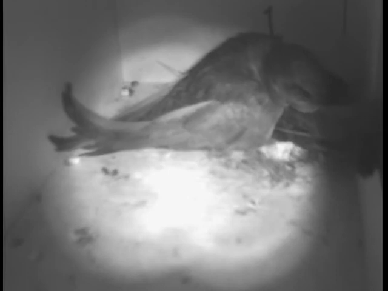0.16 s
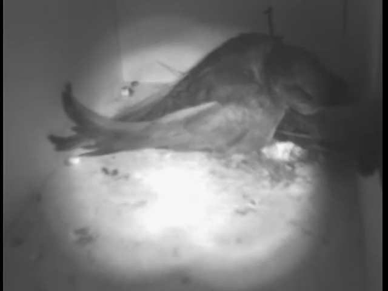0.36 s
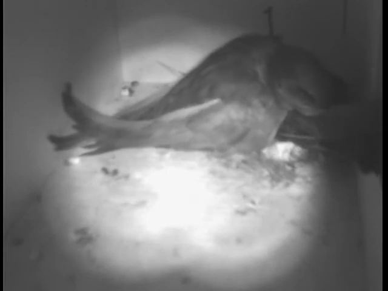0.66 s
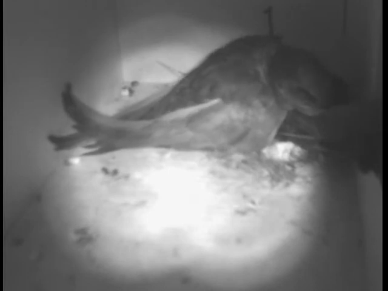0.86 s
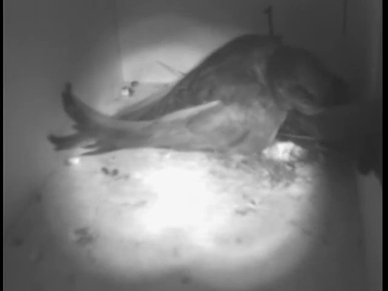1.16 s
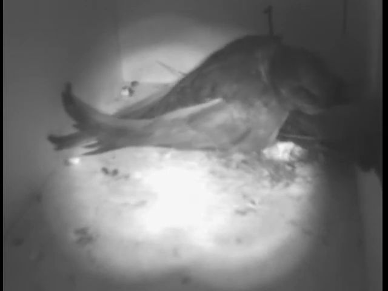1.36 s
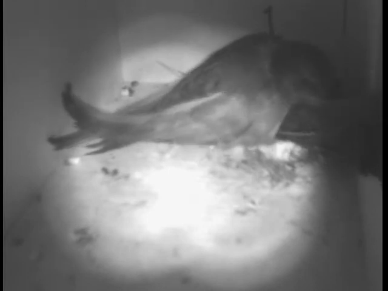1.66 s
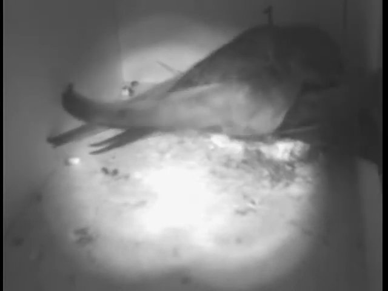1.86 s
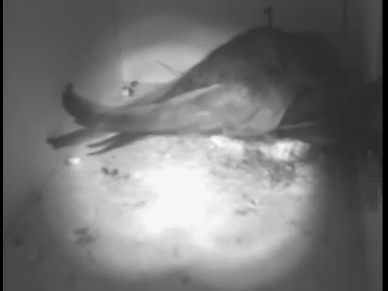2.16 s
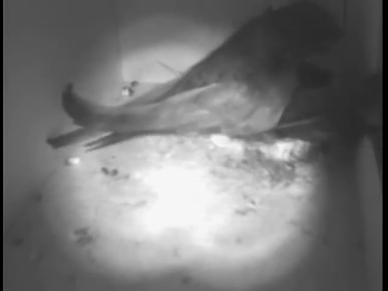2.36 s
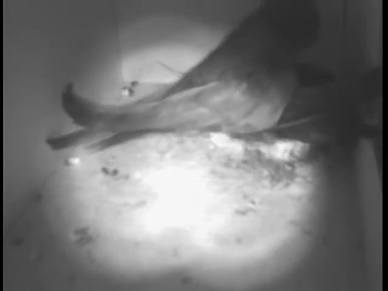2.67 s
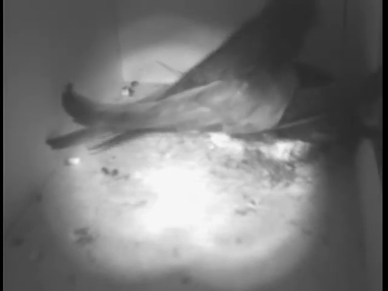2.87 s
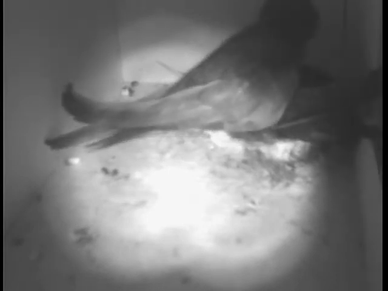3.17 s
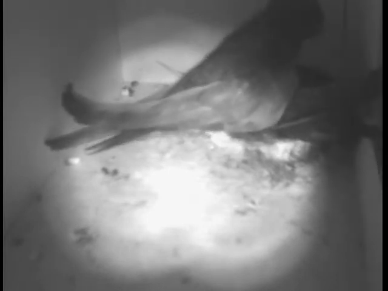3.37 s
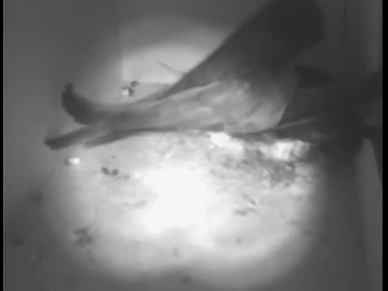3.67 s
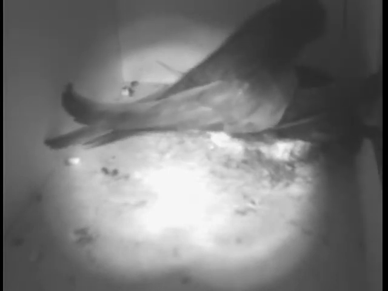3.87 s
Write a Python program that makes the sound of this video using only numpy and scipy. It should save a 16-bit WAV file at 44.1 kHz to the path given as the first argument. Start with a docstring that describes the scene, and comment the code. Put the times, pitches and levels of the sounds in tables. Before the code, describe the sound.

Engine drone rising and swelling outside a wooden nest box, with a bird's scratches and dull knocks.

```python
"""Bird in a nest box, engine outside

A bird shifts and scratches in a small wooden box: grainy strokes, dull knocks and low thumps ring its resonances.
Outside a slow engine speeds up, its orders swelling as they pass the box's air resonance, over a filtered roar.
The microphone, with its hiss and hum, feeds the right channel only.
The camera's electronics buzz, whine and click faintly into both channels."""
import sys
import numpy as np
from scipy import signal
from scipy.fft import rfft, irfft, next_fast_len
from scipy.io import wavfile
from scipy.ndimage import map_coordinates

SR = 44100
rng = np.random.default_rng(int(sys.argv[2]) if len(sys.argv) > 2 else 0)


def materialize(psi):
    """Save the field psi as 16-bit PCM at rate SR to the path in sys.argv[1].

    A 1-D psi becomes a single channel; in a 2-D psi each row is a channel.
    """
    bounded = np.clip(np.atleast_2d(psi).T, -1, 1)
    quanta = np.round(bounded * 32767).astype(np.int16)
    wavfile.write(sys.argv[1], SR, quanta)


def voltage_ratio(level):
    """Linear amplitude factor for a level in decibels (scalar or array-like)."""
    return 10 ** (np.asarray(level, float) / 20)


N = 176400
T = np.arange(N) / SR

# camera electronics
FRAME_S, FRAME_START_S = 0.04, 0.0088
COMB_HZ = 187.5
# buzz of the pulse comb, left then right: rms_db
COMB_DB = [-80, -89.5]
# click at each picture: pitch_hz, width_hz, (left and right rms_db), second_half_db relative to the first
PICTURE_CLICK = (970, 930, [-81, -75.5], -10.5)
# whines that restart with every picture: pitch_hz
WHINE_HZ = [1815, 3906.25, 7812.5]
# the same whines: left_rms_db, right_rms_db
WHINES_DB = [(-92, -101), (-86, -83.5), (-81.5, -83)]
# colour of the circuit noise: freq_hz, gain_db
CIRCUIT_COLOUR = [(100, 1.5), (1000, 0.5), (3000, -0.5), (3600, 1.5), (4050, 9.5), (4500, -4.5),
                  (6500, -1.5), (7500, -7), (7900, 9.5), (8250, 3.5), (8500, -24), (11000, -0.5)]
CIRCUIT_DB, CIRCUIT_ALIKE = -77, 0.89  # rms over both channels; left/right correlation

# microphone line
# tick, two per picture: pitch_hz, width_hz, rms_db
FIELD_TICK = (2140, 640, -79.5)
# mains hum: pitch_hz, peak_db
MAINS = [(300, -76), (400, -82)]
# colour of the microphone hiss: freq_hz, gain_db
HISS_COLOUR = [(200, -10), (600, -13), (1500, -3.5), (2500, -4), (3900, 4), (5000, -3), (6400, 0),
               (8000, -0.5), (9000, -4.5), (11000, -8.5)]
HISS_DB = -71.5  # rms

# resonances of the box's air and walls, low to high: pitch_hz, width_hz, gain_db
BOX = [(128, 15.3, 5.5), (219.8, 17, -6.5), (480.1, 18, 0.5), (909, 122, -5.5), (1041, 143, -6.5),
       (1358, 56, -10), (1647, 120, -23.5)]
BOX_LEAK_DB = -17  # flat sound that bypasses the resonances

# engine before the box: start_s, firing_rate_hz, level_db
ENGINE = [(0, 21.71, -46.5), (0.247, 22.17, -44.5), (0.447, 22.92, -47), (0.549, 24.68, -46),
          (0.699, 25.91, -43), (0.879, 26.42, -43.5), (1, 28.44, -46), (1.149, 26.75, -47),
          (1.298, 30.76, -41.5), (1.472, 31.31, -48), (1.6, 29.72, -48.5), (2.047, 30.37, -52.5),
          (2.199, 31.94, -47.5), (2.37, 35.95, -36), (2.618, 37.8, -40), (2.729, 41.65, -42.5),
          (2.939, 44.56, -37.5), (3.109, 49.8, -30), (3.24, 51.6, -32), (3.42, 57.62, -28.5),
          (3.601, 60.44, -33), (3.74, 64.76, -24.5), (3.837, 68.3, -29.5), (4, 74.4, -22.5)]
# multiples of the firing rate, from the first up: gain_db
ORDERS_DB = [-8.5, 0, 4, 1, -0.5, 4.5, -5.5, -4, 2, 3]
# walls and box air as the orders pass through: freq_hz, gain_db
ENGINE_COLOUR = [(20, -39), (55, -24), (100, -23), (118, -9), (130, 1), (143, -8), (170, -19.5), (210, -28),
                 (260, -37.5), (500, -67)]
# outside roar before the box: start_s, level_db
ROAR = [(0, -51.5), (1.2, -50.5), (2.2, -49), (3, -45.5), (3.5, -44), (4, -41.5)]
# colour of the roar before the box: freq_hz, gain_db
ROAR_COLOUR = [(25, -13.5), (50, -0.5), (140, -5), (400, -7), (800, -8.5), (1300, -13.5), (2000, -26),
               (5000, -38)]
ORDER_WAVER_DB, ROAR_WAVER_DB, WAVERS_PER_S = 2, 1.5, 5.002
ROAR_FLICKER_DB, FLICKERS_PER_S = 1.8, 22  # quick uneven swells

# body drops on the floor and pumps the box air: start_s, push_db before KNOCK_DB
THUMPS = [(1.862, -45), (2.107, -35.5)]
THUMP_BROAD_DB, THUMP_TOP_HZ = -27, 350

# feet and body on the wood: start_s, dull_push_db before KNOCK_DB, rough_edge_db before HARD_DB
KNOCKS = [(0.066, -67, -64), (0.261, -78, -59.5), (0.59, -47.5, -64.5), (0.629, -49.5, -53.5),
          (0.991, -55, -61.5), (1.088, -48, -61), (1.397, -55, -59), (1.524, -51.5, -58.5),
          (1.645, -63, -64), (1.677, -44.5, -78), (1.726, -56, -82), (1.857, -48, -53), (1.892, -49, -55.5),
          (2.1, -43, -53), (2.152, -45, -56), (2.723, -47.5, -56), (2.828, -48.5, -76), (3.321, -51, -84),
          (3.857, -46.5, -80)]
KNOCK_S = 0.005  # rough edge peaks this long after the contact
KNOCK_DB, HARD_DB, LOW_BOX_DB, SOFT_HZ = 51, 27.5, -10.5, 1350

# feathers and claws: start_s, treble_db before RUSTLE_DB, mid_over_treble_db, length_s (to 1.3 lengths in all)
RUSTLES = [(1.4, -71, 2, 0.014), (1.519, -72, -3, 0.057), (1.65, -55, -3, 0.052), (1.697, -53.5, -5, 0.048),
           (1.745, -72.5, -7, 0.1), (1.846, -58.5, -6, 0.044), (1.86, -48, -13, 0.012),
           (1.882, -60, -2.5, 0.07), (2.02, -67.5, -17, 0.011), (2.076, -65, 0.5, 0.037),
           (2.101, -57.5, -5.5, 0.018), (2.122, -64, -3, 0.032), (2.149, -58, -6, 0.013),
           (2.163, -71, -7, 0.06), (2.355, -73.5, -5, 0.086), (2.439, -66.5, -2, 0.064),
           (2.512, -70, 4.5, 0.018), (2.556, -68, -3, 0.01), (2.721, -74, 14.5, 0.0091),
           (2.823, -59.5, 2.5, 0.0069), (2.833, -71.5, -7, 0.083), (3.277, -75.5, 14, 0.015),
           (3.324, -66.5, 7.5, 0.0092), (3.364, -62, -1, 0.011), (3.386, -76, 8, 0.011),
           (3.413, -64, 9, 0.0075), (2.959, -69.5, -8, 0.0092), (3.607, -74.5, 4, 0.042),
           (3.842, -69.5, 5, 0.038), (3.89, -74.5, 6.5, 0.093)]
# bright resonances near the microphone, middle group: pitch_hz, width_hz, gain_db
MID_RING = [(2980, 330, -1), (3648, 320, 2.5), (4162, 300, 0.5)]
# bright resonances near the microphone, top group: pitch_hz, width_hz, gain_db
TOP_RING = [(5350, 220, -9.5), (6300, 400, 1), (7450, 900, -0.5)]
# broad part of the rustle: freq_hz, gain_db
SCRAPE_COLOUR = [(1500, -36), (2600, -16.5), (4800, -16.5), (5900, -10), (8300, -13.5), (9500, -18.5),
                 (10500, -20), (11000, -12)]
RUSTLE_DB, RUSTLE_IN_BOX_DB = 14.5, 1
RUSTLE_RISE = 0.13  # fraction of the stroke length
GRAINS_PER_S, GRAIN_SPREAD_DB = 9000, 0.5
CLUMP_DB, CLUMPS_PER_S = 3, 170


def unit(x):
    """Scale to rms 1."""
    return x / np.sqrt(np.mean(x ** 2) + 1e-20)


def filtered(x, response):
    """Multiply the spectrum of x by a complex response of frequency."""
    m = next_fast_len(N + SR // 2)
    return irfft(rfft(x, m) * response(np.fft.rfftfreq(m, 1 / SR)), m)[..., :N]


def colour(points):
    """Gain curve through (freq_hz, gain_db) points on a log axis."""
    f, db = np.transpose(points)
    return lambda hz: voltage_ratio(np.interp(np.log(hz + 1), np.log(f), db))


def rings(table, leak_db=-60):
    """Causal sum of resonances, alternating in sign, with a flat leak."""
    def response(f):
        total = voltage_ratio(leak_db)
        for k, (centre, width, db) in enumerate(table):
            resonance = 1j * f * width / (centre * centre - f * f + 1j * f * width)
            total = total + (-1) ** k * voltage_ratio(db) * resonance
        return total
    return response


def wobble(rate):
    """A smooth random curve, rate knots a second."""
    knots = rng.standard_normal(int(N * rate / SR) + 4)
    return map_coordinates(knots, [T * rate])


def train(period, start):
    """Clicks at a steady period."""
    x = np.zeros(N)
    times = np.arange(start, N / SR - 0.001, period)
    x[np.round(times * SR).astype(int)] = 1
    return x


def circuit_noise():
    """Coloured noise, largely shared between the two channels."""
    a, b = filtered(rng.standard_normal((2, N)), colour(CIRCUIT_COLOUR))
    right = CIRCUIT_ALIKE * a + np.sqrt(1 - CIRCUIT_ALIKE ** 2) * b
    return voltage_ratio(CIRCUIT_DB) * unit(np.array([a, right]))


def electronics():
    """Sines restarted at the picture rate, a pulse-comb buzz, resonant picture clicks and circuit noise."""
    since = (T - FRAME_START_S) % FRAME_S
    whines = np.zeros((2, N))
    for hz, (left, right) in zip(WHINE_HZ, WHINES_DB):
        whines += voltage_ratio([[left], [right]]) * np.sqrt(2) * np.sin(2 * np.pi * hz * since)
    comb = unit(train(1 / COMB_HZ, 0) - COMB_HZ / SR)  # less its mean
    buzz = -voltage_ratio(COMB_DB)[:, None] * comb

    hz, width, db, second_db = PICTURE_CLICK
    clicks = train(FRAME_S, FRAME_START_S)
    clicks += voltage_ratio(second_db) * train(FRAME_S, FRAME_START_S + FRAME_S / 2)

    def low_pass(f):
        return hz * hz / (hz * hz - f * f + 1j * f * width) * (f > 20)
    picture_clicks = voltage_ratio(db)[:, None] * unit(filtered(clicks, low_pass))
    return whines + buzz + picture_clicks + circuit_noise()


def microphone_line():
    """Coloured hiss, mains harmonics and a resonant fast tick on the microphone's own channel."""
    hz, width, db = FIELD_TICK
    ticks = train(FRAME_S / 2, FRAME_START_S)
    tick = voltage_ratio(db) * unit(filtered(ticks, lambda f: rings([(hz, width, 0)])(f) ** 2))
    hum = sum(voltage_ratio(d) * np.sin(2 * np.pi * f * T) for f, d in MAINS)
    hiss = voltage_ratio(HISS_DB) * unit(filtered(rng.standard_normal(N), colour(HISS_COLOUR)))
    return tick + hum + hiss


def engine():
    """Sine orders of a rising firing rate swell where the walls and box air let them through."""
    s, hz, db = np.transpose(ENGINE)
    turn = 2 * np.pi * np.cumsum(np.interp(T, s, hz)) / SR
    tones = np.zeros(N)
    for order, order_db in enumerate(ORDERS_DB, 1):
        level = voltage_ratio(order_db + ORDER_WAVER_DB * wobble(WAVERS_PER_S))
        tones += level * np.sin(order * turn + rng.uniform(0, 2 * np.pi))
    return filtered(voltage_ratio(np.interp(T, s, db)) * tones, colour(ENGINE_COLOUR))


def roar():
    """Uneven broadband noise from outside excites the box resonances."""
    noise = unit(filtered(rng.standard_normal(N), colour(ROAR_COLOUR)))
    level_db = np.interp(T, *np.transpose(ROAR))
    level_db = level_db + ROAR_WAVER_DB * wobble(WAVERS_PER_S) + ROAR_FLICKER_DB * wobble(FLICKERS_PER_S)
    return filtered(noise * voltage_ratio(level_db), rings(BOX, BOX_LEAK_DB))


def thumps():
    """A heavy, dull push: the lowest air resonance rings over a short broad thud."""
    push = np.zeros(N)
    for s, db in THUMPS:
        push[round(s * SR)] = voltage_ratio(db + KNOCK_DB)

    def response(f):
        low_cut = 1j * f / (BOX[0][0] / 2 + 1j * f)
        high_cut = 1 / (1 + 1j * f / THUMP_TOP_HZ) ** 2
        return rings(BOX[:1], THUMP_BROAD_DB)(f) * low_cut * high_cut
    return filtered(push, response)


def dull(hz):
    """Soft contact rolls off the highs: nothing sharp gets into the wood."""
    x = hz / SOFT_HZ
    return 1 / (1 + 1j * x - x ** 2) ** 2


def knocks():
    """Impulses ring the low box; a short noise burst, the rough edge, rings the upper resonances."""
    soft, hard = np.zeros(N + SR), np.zeros(N + SR)
    u = np.arange(SR // 20) / SR / KNOCK_S
    burst = np.e * u * np.exp(-u)
    for s, db, hard_db in KNOCKS:
        start = round(s * SR)
        soft[start] = voltage_ratio(db + KNOCK_DB)
        hard[start:start + len(u)] += voltage_ratio(HARD_DB + hard_db) * rng.standard_normal(len(u)) * burst
    body = filtered(soft[:N], rings(BOX[2:3]))
    edge = filtered(hard[:N], rings(BOX[3:]))
    low = voltage_ratio(LOW_BOX_DB) * filtered(soft[:N], rings(BOX[:2]))
    return filtered(body + edge + low, dull)


def grains():
    """Dense random slips in uneven clumps, rms 1."""
    hits = rng.random(N) < GRAINS_PER_S / SR
    slips = hits * rng.standard_normal(N) * voltage_ratio(GRAIN_SPREAD_DB * rng.standard_normal(N))
    return unit(slips * voltage_ratio(CLUMP_DB * wobble(CLUMPS_PER_S)))


def rustles():
    """Each stroke is a burst of grains that rings the bright resonances and the box."""
    top, mid = np.zeros(N), np.zeros(N)
    for s, db, mid_db, length in RUSTLES:
        u = (T - s) / length
        shape = np.clip(u / RUSTLE_RISE, 0, 1) * np.clip((1.3 - u) / 1.07, 0, 1)
        top += voltage_ratio(db + RUSTLE_DB) * shape
        mid += voltage_ratio(db + mid_db + RUSTLE_DB) * shape
    bright = filtered(top * grains(), lambda f: rings(TOP_RING)(f) ** 2)
    scrape = filtered(top * grains(), colour(SCRAPE_COLOUR))
    middle = filtered(mid * grains(), lambda f: rings(MID_RING)(f) ** 2)
    in_box = filtered((top + mid) * grains(), lambda f: rings(BOX[2:], BOX_LEAK_DB)(f) * dull(f))
    return bright + scrape + middle + voltage_ratio(RUSTLE_IN_BOX_DB) * in_box


def scene():
    """The microphone on the right; electronics on both sides."""
    heard = microphone_line() + engine() + roar() + thumps() + knocks() + rustles()
    return electronics() + np.array([np.zeros(N), heard])


def band_limit(x):
    """A steep low-pass at the top of the band."""
    return signal.sosfilt(signal.butter(12, 11110, fs=SR, output="sos"), x)


def record(dry):
    """Pass the finished mix on to its final form."""
    return band_limit(dry)


dry = scene()
out = record(dry)
materialize(out)
```